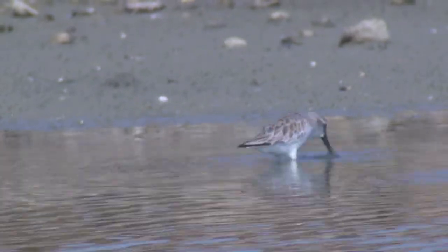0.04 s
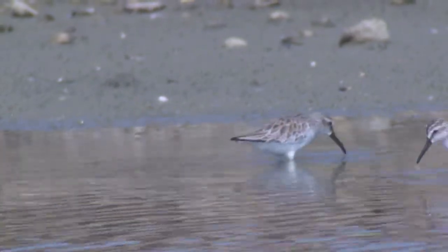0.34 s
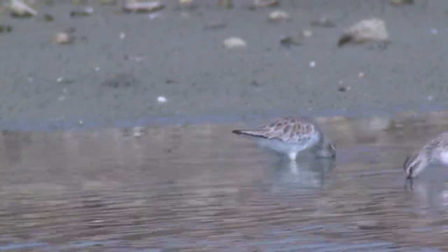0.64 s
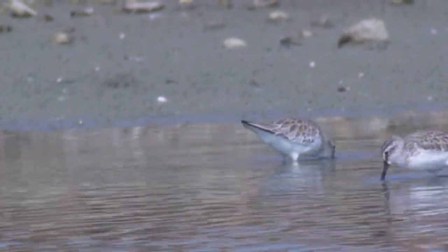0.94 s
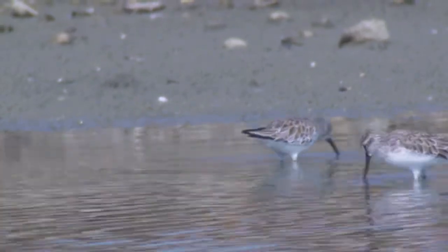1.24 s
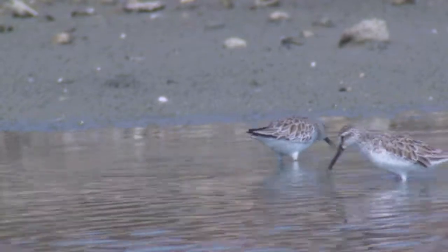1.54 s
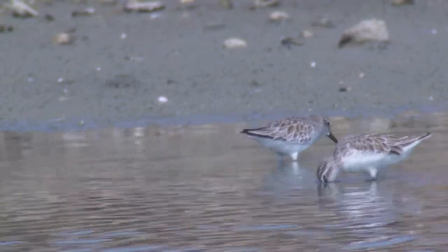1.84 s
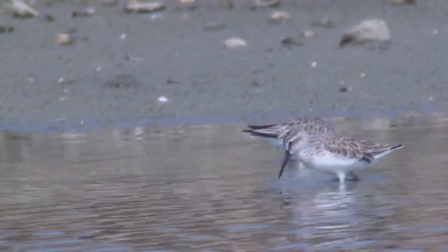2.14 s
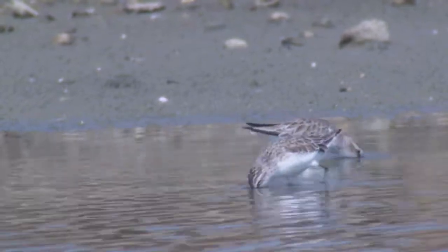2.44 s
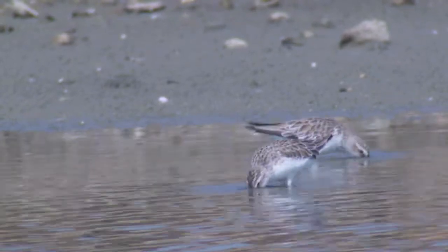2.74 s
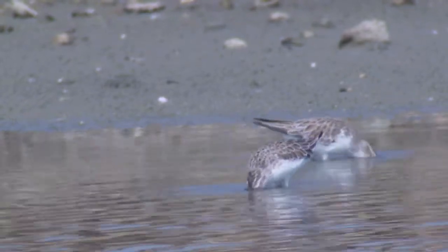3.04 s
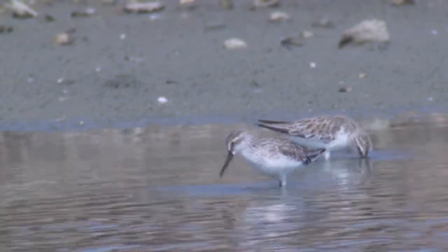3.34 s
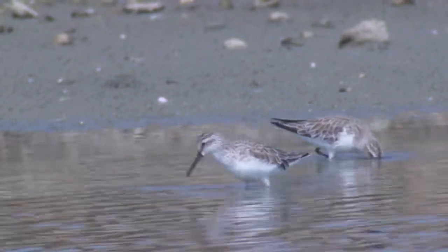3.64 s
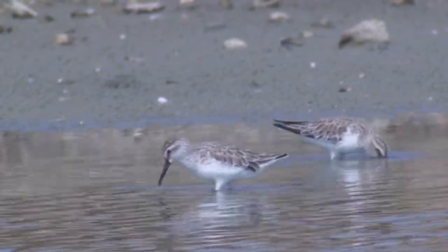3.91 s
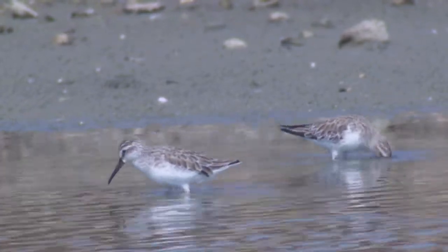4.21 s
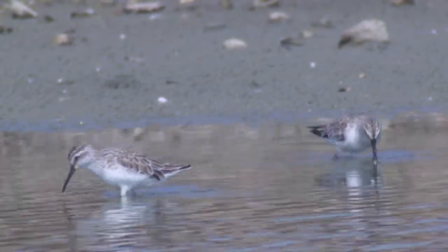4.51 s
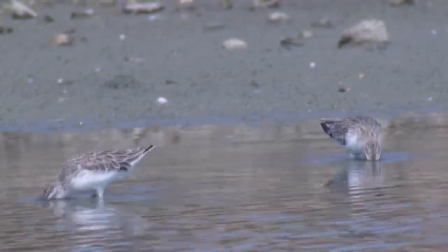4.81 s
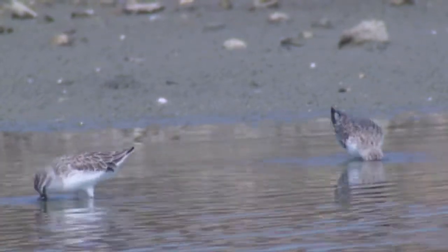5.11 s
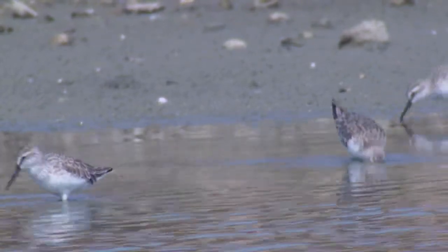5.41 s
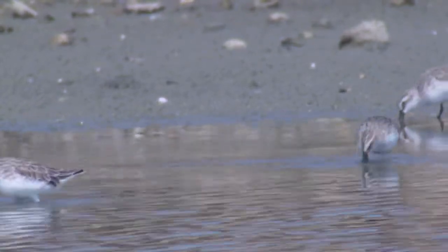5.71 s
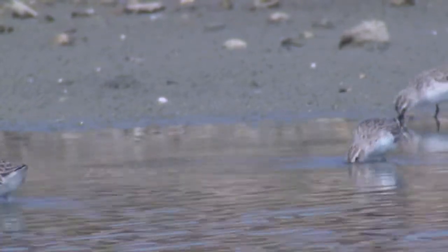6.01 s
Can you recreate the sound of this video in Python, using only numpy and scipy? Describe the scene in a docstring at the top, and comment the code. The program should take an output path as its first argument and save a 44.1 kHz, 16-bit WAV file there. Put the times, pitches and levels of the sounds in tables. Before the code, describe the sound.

Wind buffets the microphone lightly while small shorebirds chirp and peep here and there, with a few faint water plops.

```python
"""Sandpipers on a windy mudflat

Sandpipers feed in shallow water, calling in thin chirps, mellow peeps and one sharp chip; syrinx
tension rises and relaxes, so each pitch draws an arch. One peep echoes faintly; other birds whistle
far off. Now and then the water plops. A few light ticks and one faint, dry click are heard.
Gusts buffet the microphone over a steady hiss of open air."""
import sys
import numpy as np
from scipy import signal
from scipy.fft import rfft, irfft
from scipy.io import wavfile

SR = 44100
rng = np.random.default_rng(int(sys.argv[2]) if len(sys.argv) > 2 else 0)


def persist_wave(psi):
    """Save psi, clipped to +-1, as 16-bit WAV."""
    counts = np.round(np.clip(psi, -1, 1) * 32767).astype(np.int16)
    wavfile.write(sys.argv[1], SR, np.atleast_2d(counts).T)


N = 267246
TIME_S = np.arange(N) / SR

# row 0 a peep's echo, the rest far whistles: start_s, length_s, top_hz, level_db
FAINT_NOTES = [(1.065, .06, 2760, -54), (1.294, .038, 2620, -52), (2.678, .076, 1980, -62),
               (3.141, .073, 2940, -60), (3.14, .09, 1946, -62), (3.806, .092, 1990, -62),
               (4.099, .12, 2340, -63), (5.551, .071, 2144, -61), (5.6, .075, 2320, -60)]
# row 1 a dry click, the rest light ticks: start_s, length_s, pitch_hz, level_db
TICKS_AND_CLICK = [(1.384, 0.0015, 4240, -52), (1.422, 0.0014, 2560, -56), (2.067, 0.0055, 5900, -57),
                   (5.936, 0.0025, 5700, -49), (5.949, .004, 5730, -55)]


def syrinx(length_s, start_hz, top_hz, end_hz, waver, bend=1.8):
    """Phase and swell of a note: tension rises and relaxes, arching the pitch."""
    u = np.linspace(0, 1, int(length_s * SR))
    rise, fall = np.abs([top_hz - start_hz, top_hz - end_hz]) ** (1 / bend)
    hz = top_hz - np.abs(u * (rise + fall) - rise) ** bend
    throat = (hz / top_hz) ** 2  # tuned to the top, so the flanks are weaker
    hz = hz * (1 + waver * drift(250, len(u)))
    return 2 * np.pi * np.cumsum(hz) / SR, np.sin(np.pi * u) * throat


def bird_note(start_s, length_s, start_hz, top_hz, end_hz, level_db,
              octave_db=-30, waver=.0042, flutter_db=1.0):
    """Nearly pure tone with a weak octave."""
    phase, swell = syrinx(length_s, start_hz, top_hz, end_hz, waver)
    envelope = swell ** .82 * from_db(level_db + flutter_db * drift(160, len(phase)))
    tone = np.sin(phase) + from_db(octave_db) * swell * np.sin(2 * phase)
    return place(start_s, envelope * tone)


def sandpiper_call(start_s, length_s, top_hz, crest_share, level_db, dip=.105, octave_db=-22):
    """One arch, by default a shallow peep; an early crest makes it a falling slur."""
    flanks = (2 * np.array([crest_share, 1 - crest_share])) ** 1.8
    start_hz, end_hz = top_hz * (1 - np.minimum(dip * flanks, .5))
    overtone_db = octave_db - 36 * np.log2(top_hz / 2990)  # higher notes are purer
    return bird_note(start_s, length_s, start_hz, top_hz, end_hz, level_db, overtone_db)


def chirps():
    """Steep arches with a clear octave."""
    # start_s, length_s, top_hz, crest_share, level_db
    steep_notes = [(0.107, 0.036, 3075, 0.47, -53.5), (0.212, 0.065, 3130, 0.52, -54),
                   (.487, 0.033, 4680, 0.62, -52), (0.775, .057, 3780, .52, -44.5),
                   (1.86, .035, 3100, .4, -57.5), (2.173, 0.032, 4560, 0.53, -56),
                   (2.178, 0.055, 3160, 0.45, -51), (2.611, .046, 4290, 0.56, -57.5),
                   (2.869, 0.034, 3080, 0.4, -46.5), (3.672, 0.067, 4380, 0.49, -54),
                   (3.738, .046, 4020, .46, -57.5), (4.366, 0.043, 4080, .38, -41.5),
                   (4.411, 0.032, 3930, 0.45, -40), (4.458, 0.038, 4400, .48, -43),
                   (5.156, 0.08, 3450, 0.6, -54.5), (5.239, 0.051, 3260, 0.6, -56.5),
                   (5.732, 0.032, 4580, 0.44, -45)]
    return sum(sandpiper_call(*row, dip=.26, octave_db=-10.5) for row in steep_notes)


def peeps():
    """Mellow, flatter arches and slurs."""
    # start_s, length_s, top_hz, crest_share, level_db
    mellow_notes = [(.95, .051, 2875, 0.36, -39), (1.036, .044, 2860, .65, -39.5),
                    (1.121, .046, 2975, .63, -37.5), (1.28, .025, 2900, 0.504, -52),
                    (1.32, .022, 2840, .5, -54), (2.697, .044, 3130, .16, -41.5),
                    (2.818, .03, 3020, .25, -56), (3.385, .069, 3064, 0.15, -44.5),
                    (4.362, .016, 4330, .15, -52), (5.054, .039, 2610, .25, -56),
                    (5.674, .069, 3097, 0.21, -43.5)]
    return sum(sandpiper_call(*row) for row in mellow_notes)


def chip(start_s=5.376, level_db=-33, tremble_hz=128, depth=.95, rasp_db=-16):
    """Close, high note: bursts out in rasping stutters, then steadies and fades."""
    phase, swell = syrinx(length_s=.048, start_hz=5220, top_hz=5400, end_hz=5040, waver=.016)
    t = TIME_S[:len(phase)]
    unsteady = 1 - t / t[-1]
    beats = tremble_hz * t + .061 * drift(87, len(t))
    stutter = 1 - depth * unsteady ** .9 * np.cos(np.pi * beats) ** 4
    rasp = unit_rms(butter(rng.standard_normal(len(t)), [3700, 7300], "band", order=4))
    fade = np.minimum(1, unsteady / .43)
    voice = np.sqrt(swell) * fade * np.sin(phase) + from_db(rasp_db) * np.sqrt(unsteady) * rasp
    return place(start_s, from_db(level_db) * stutter * voice)


def flock(notes_per_s=2.5, length_s=.029, low_hz=2490, high_hz=3610, level_db=-59.5):
    """Faint peeps at random times and pitches."""
    out = np.zeros(N)
    for when, pitch, crest_share in rng.random((int(notes_per_s * N / SR), 3)):
        top_hz = low_hz * (high_hz / low_hz) ** pitch
        out += sandpiper_call(when * N / SR, length_s, top_hz, crest_share, level_db)
    return out


def faint_note(start_s, length_s, top_hz, level_db, rise=.055, sag=.009):
    """Slides up and levels off, fluttering on its way through the air."""
    start_hz, end_hz = top_hz * (1 - rise), top_hz * (1 - sag)
    return bird_note(start_s, length_s, start_hz, top_hz, end_hz, level_db, waver=.0022, flutter_db=3.0)


def peep_echo():
    """Faint echo of the nearby peep, voiced as one soft note."""
    return faint_note(*FAINT_NOTES[0])


def far_birds(pips_start_s=5.336, pip_step_s=.04, pip_count=6):
    """Distant whistles and one quick, even run of pips."""
    whistles = sum(faint_note(*row) for row in FAINT_NOTES[1:])
    pip_times_s = pips_start_s + pip_step_s * np.arange(pip_count)
    return whistles + sum(faint_note(s, length_s=.027, top_hz=3520, level_db=-61) for s in pip_times_s)


def burst(start_s, length_s, pitch_hz, level_db, spread=.11):
    """Short noise burst around one pitch."""
    u = TIME_S[:int(length_s * SR)] / length_s
    noise = np.pad(rng.standard_normal(len(u)) * np.sqrt(u) * (1 - u), (0, SR // 100))
    noise = butter(noise, [pitch_hz / (1 + spread), pitch_hz * (1 + spread)], "band")
    return place(start_s, from_db(level_db) * noise / np.abs(noise).max())


def water():
    """Small plops, each a burst of tiny collapses."""
    # start_s, length_s, pitch_hz, level_db
    plops = [(.993, 0.019, 1180, -49), (1.043, 0.024, 1140, -44.5), (1.125, 0.015, 1200, -48.5),
             (2.065, 0.0062, 890, -48), (2.362, 0.013, 1160, -51), (2.421, 0.015, 1180, -51.5),
             (5.935, 0.0063, 925, -49.5)]
    return sum(burst(*row, spread=.24) for row in plops)


def ticks_and_click():
    """Light, high ticks and one faint, dry click."""
    return sum(burst(*row) for row in TICKS_AND_CLICK)


def bank_echo(x, echo_db=-24, t60_s=.2, delay_s=.008):
    """Adds the thin, short tail that the bank scatters back."""
    t = TIME_S[:SR // 2]
    scatter = rng.standard_normal(len(t)) * from_db(-60 * t / t60_s) * (t > delay_s)
    return x + from_db(echo_db) * signal.fftconvolve(x, scatter / np.linalg.norm(scatter))[:N]


def gust_envelope(attack_s=.019, release_s=.035):
    """Each gust on the microphone swells, holds and dies away."""
    # start_s, length_s, level_db
    gusts = [(0.447, 0.034, -49), (0.62, 0.031, -52.5), (0.762, 0.035, -48.5), (1.201, 0.034, -51.5),
             (1.689, 0.033, -51.5), (2.059, 0.051, -52.5), (2.288, 0.34, -44.5), (2.684, 0.066, -51.5),
             (2.764, 0.06, -45), (2.85, 0.036, -48.5), (2.895, 0.06, -42.5), (2.978, 0.055, -45.5),
             (3.099, 0.06, -49.5), (3.17, 0.32, -45), (3.643, 0.078, -48.5), (3.747, 0.036, -51),
             (3.963, 0.064, -48.5), (4.03, 0.071, -49.5), (4.135, 0.053, -49.5), (4.216, 0.11, -46.5),
             (4.581, 0.146, -47), (4.77, 0.16, -44), (4.95, 0.036, -48), (4.988, 0.042, -48.5),
             (5.064, 0.23, -45.5), (5.364, 0.058, -52), (5.449, 0.069, -48.5), (5.533, 0.076, -46),
             (5.633, 0.078, -48.5), (5.72, 0.058, -46), (5.825, 0.044, -50.5), (5.873, 0.085, -51),
             (5.986, 0.062, -46)]
    out = np.zeros(N)
    for start_s, length_s, level_db in gusts:
        attack = np.clip(.5 + (TIME_S - start_s) / attack_s, 0, 1)
        release = np.clip(.5 + (start_s + length_s - TIME_S) / release_s, 0, 1)
        out = np.maximum(out, from_db(level_db) * attack * release)
    return out


def eddies(drive_db, calm_db=-55, db_per_octave=17, step_db=-1.92, spread_db=4.5):
    """Pressure lumps in six sizes; stronger gusts stir smaller eddies."""
    corner_hz = 190 * 2 ** ((drive_db - calm_db) / db_per_octave)
    out = np.zeros(N)
    for step in range(6):
        hz = 115 * 1.45 ** step
        strengths = from_db(spread_db * np.minimum(rng.exponential(1, N), 3)) * rng.choice([-1, 1], N)
        kicks = strengths * (rng.random(N) < hz / SR)  # about one per cycle
        lumps = butter(kicks, [hz / 1.35, hz * 1.31], "band")
        lumps = unit_rms(butter(lumps, hz * 1.5, "low"))
        out += lumps * from_db(drive_db + step_db * step) / np.sqrt(1 + (hz / corner_hz) ** 7)
    return out


def buffets(width_cycles=.16, rebound=.48):
    """Each big eddy is one smooth low thump of either sign, then a broader, weaker rebound."""
    # time_s, level_db, centre_hz
    big_eddies = [(.587, -41, 119), (2.093, -47, 198), (2.322, -37.5, 210), (2.378, -33.5, 240),
                  (2.595, -33.5, 161), (3.284, -30, 317), (3.383, -32.5, 292), (4.179, -36.5, 173),
                  (4.267, -38, 230), (4.589, -38, 180), (4.665, -36, 160), (4.828, -31, 180),
                  (4.861, -33, 170), (4.904, -35.5, 280), (5.072, -35.5, 230), (5.214, -27.5, 212)]
    t = np.arange(-SR // 50, SR // 50) / SR
    out = np.zeros(N)
    for time_s, level_db, centre_hz in big_eddies:
        u = t * centre_hz / width_cycles
        pressure = np.exp(-u ** 2) - rebound * np.exp(-(u / 2 - 1) ** 2)
        out += place(time_s + t[0], from_db(level_db) * rng.choice([-1, 1]) * pressure)
    return out


def wind(eddy_db=-2.5, buffet_db=2.5, rumble_db=3.0, flutter_db=2.6, lull_db=-12, gust_rumble_db=-7):
    """Breeze and gusts drive fluttering eddies and a slow rumble; single buffets ride on top."""
    # time_s, level_db
    breeze_curve = [(0.0, -60), (0.32, -62.5), (0.47, -49.5), (0.96, -62.5), (1.23, -50.5), (1.32, -59.5),
                    (1.72, -52.5), (1.75, -59), (2.62, -48.5), (2.65, -53.5), (3.49, -50.5), (3.53, -59),
                    (3.73, -47.5), (3.88, -52), (3.98, -46), (4.44, -53), (4.66, -50.5), (6.06, -50)]
    breeze = from_db(np.interp(TIME_S, *np.transpose(breeze_curve)))
    gust = gust_envelope()
    heave = butter(rng.standard_normal(N), 28, "low", order=1)
    rumble = unit_rms(butter(heave, [11, 110], "band")) * np.hypot(breeze, from_db(gust_rumble_db) * gust)
    drive_db = 20 * np.log10(np.hypot(gust, from_db(lull_db) * breeze))
    swirl = eddies(drive_db + flutter_db * drift(22))
    return from_db(eddy_db) * swirl + from_db(buffet_db) * buffets() + from_db(rumble_db) * rumble


def open_air(hiss_db=-58, rumble_db=-65):
    """Smooth hiss of the open flat over a faint, distant rumble."""
    # frequency_hz, density_db
    hiss_spectrum = [(88, -53.5), (150, -12), (324, -10.5), (394, -12.5), (464, -15.5), (603, -12.5),
                     (1090, -6), (2380, -8.5), (2590, -8.5), (3100, -9), (3650, -12.5), (6260, -17),
                     (7500, -20), (9750, -62), (16500, -120)]
    hz, density_db = np.transpose(hiss_spectrum)
    bins_hz = np.maximum(np.arange(N // 2 + 1) * SR / N, 1)
    shape = from_db(np.interp(np.log(bins_hz), np.log(hz), density_db))
    hiss = irfft(rfft(rng.standard_normal(N)) * shape, N)
    rumble = butter(rng.standard_normal(N), [20, 90], "band")
    return from_db(hiss_db) * unit_rms(hiss) + from_db(rumble_db) * unit_rms(rumble)


def from_db(db):
    """Decibels to gain."""
    return 10 ** (np.asarray(db) / 20)


def unit_rms(x):
    """Scale to unit rms."""
    return x / np.sqrt(np.mean(x ** 2) + 1e-20)


def butter(x, hz, kind, order=2):
    """Causal Butterworth filter."""
    return signal.sosfilt(signal.butter(order, hz, kind, fs=SR, output="sos"), x + 1e-18)


def drift(hz, size=N):
    """Smooth random wander below hz, unit rms."""
    return unit_rms(butter(rng.standard_normal(size + SR), hz, "low")[SR:])


def place(start_s, sound):
    """Full-length track with the sound at start_s."""
    track = np.zeros(N)
    at = int(start_s * SR)
    track[at:at + len(sound)] = sound[:N - at]
    return track


def scene(chirp_gain_db=1.0, peep_gain_db=.5, burst_gain_db=3.5):
    """All sounds, alike at two close microphone ports."""
    weather = open_air() + wind()
    calls = from_db(chirp_gain_db) * chirps() + from_db(peep_gain_db) * peeps() + chip()
    bursts = from_db(burst_gain_db) * (water() + ticks_and_click())
    faint_calls = peep_echo() + far_birds() + flock()
    sound = bank_echo(calls + faint_calls + bursts) + weather
    return np.array([sound, sound])


def record(dry, left_cut_hz=165, left_bass_gain=.13, self_noise_db=-66, rolloff_hz=6750, cutoff_hz=7900):
    """The left capsule is thin in the bass; each adds its own hiss; the top is cut."""
    left = dry[0] - (1 - left_bass_gain) * butter(dry[0], left_cut_hz, "low", order=1)
    ports = np.array([left, dry[1]]) + from_db(self_noise_db) * rng.standard_normal((2, N))
    ports = butter(ports, rolloff_hz, "low", order=8)
    return signal.sosfilt(signal.ellip(12, .1, 80, cutoff_hz, fs=SR, output="sos"), ports)


dry = scene()
out = record(dry)
persist_wave(out)
```